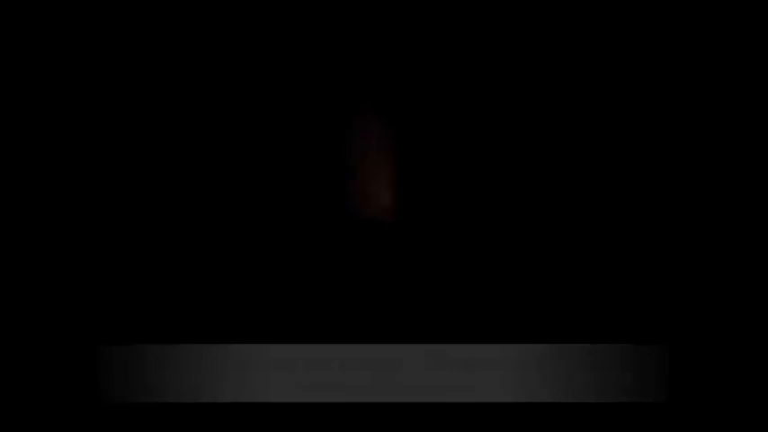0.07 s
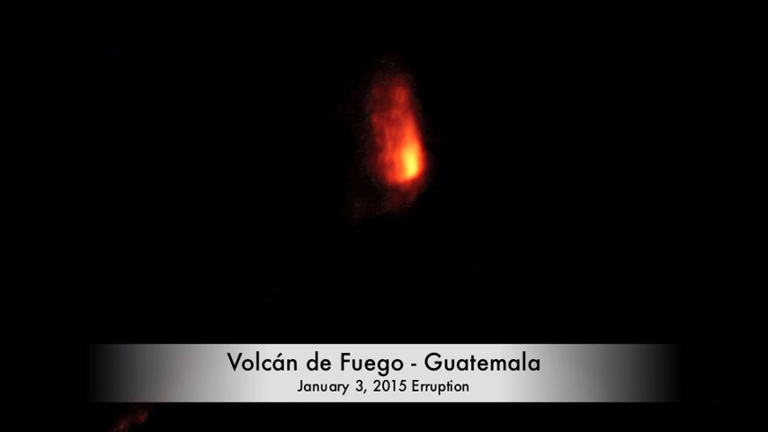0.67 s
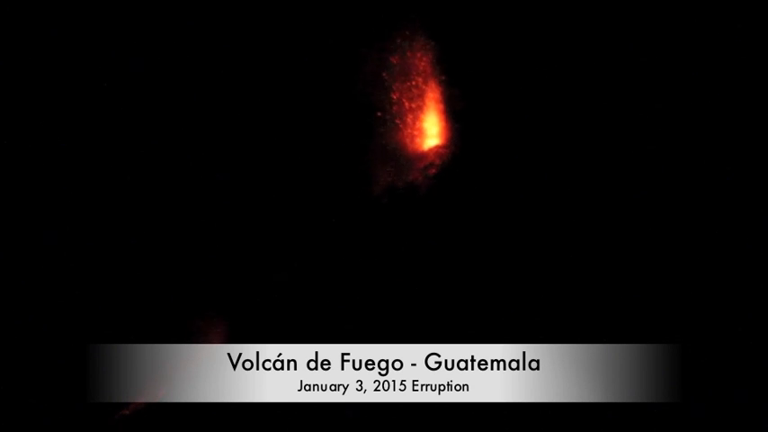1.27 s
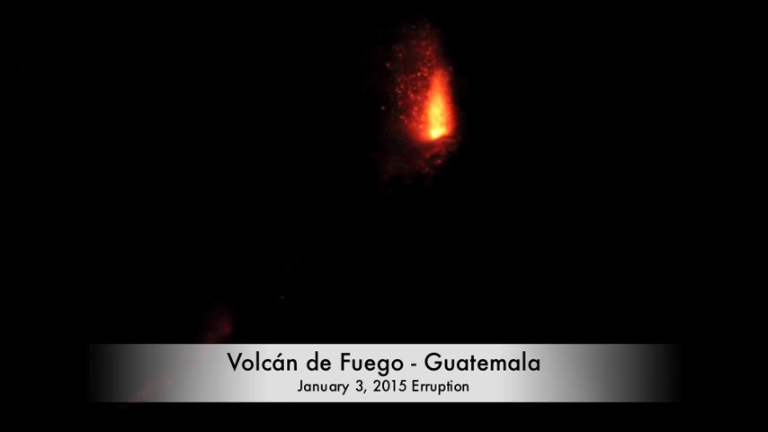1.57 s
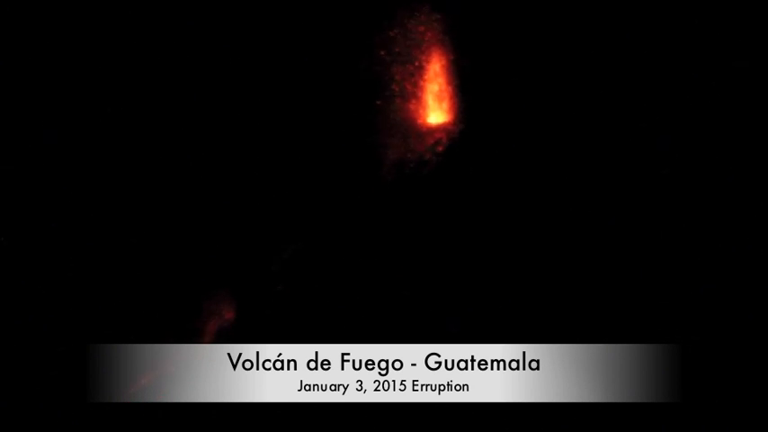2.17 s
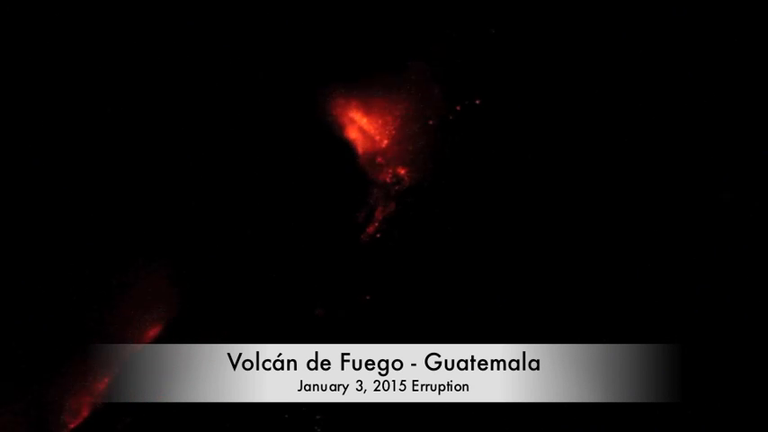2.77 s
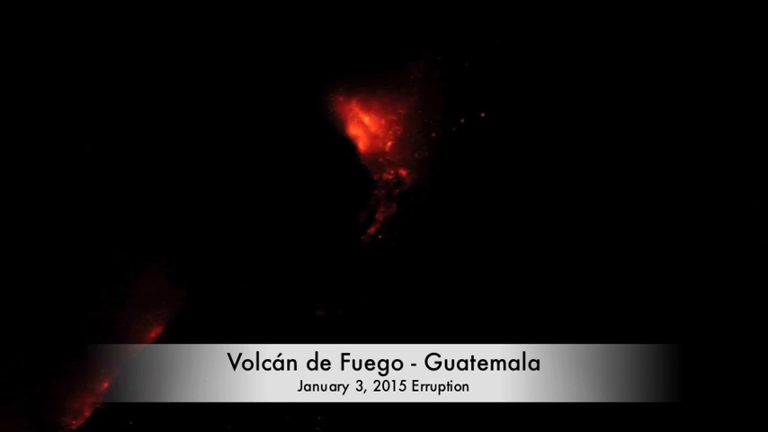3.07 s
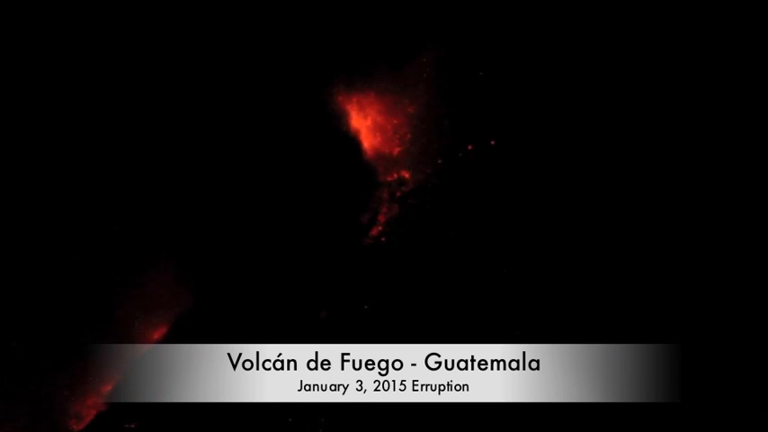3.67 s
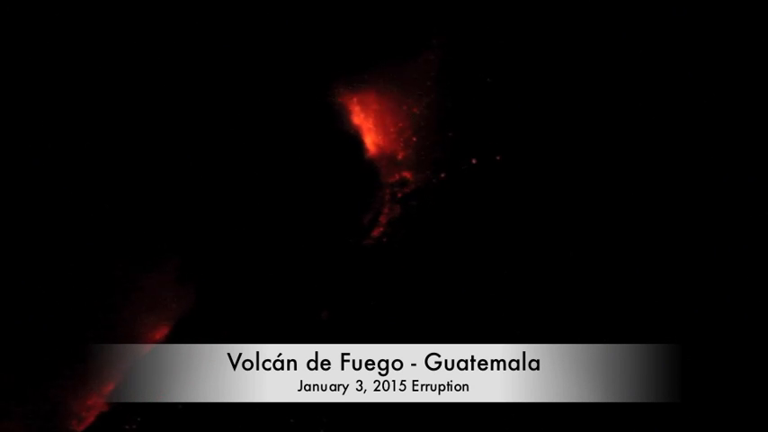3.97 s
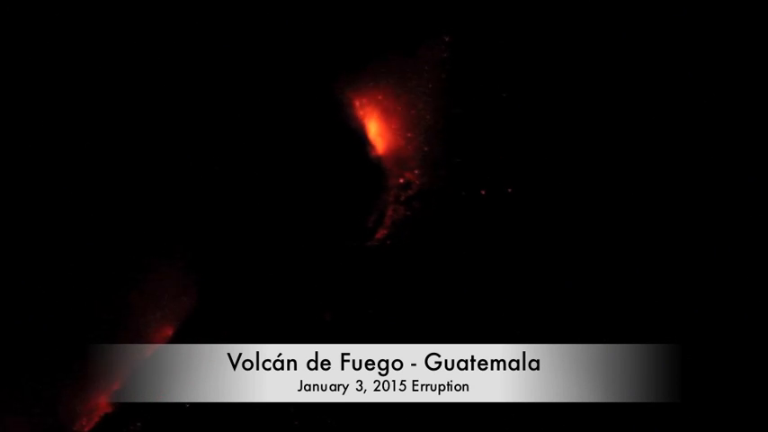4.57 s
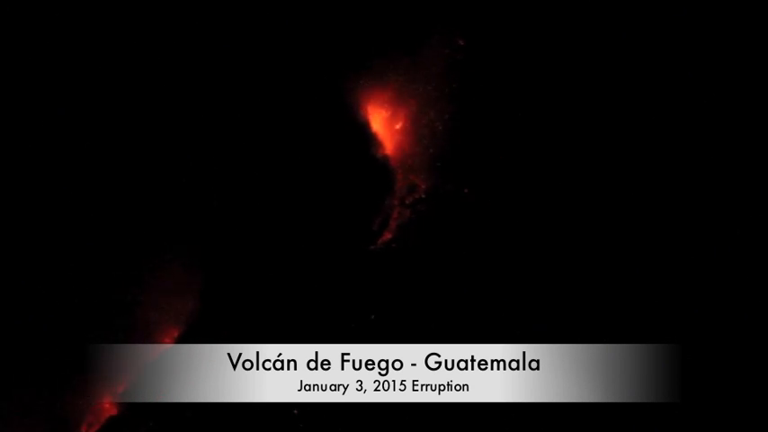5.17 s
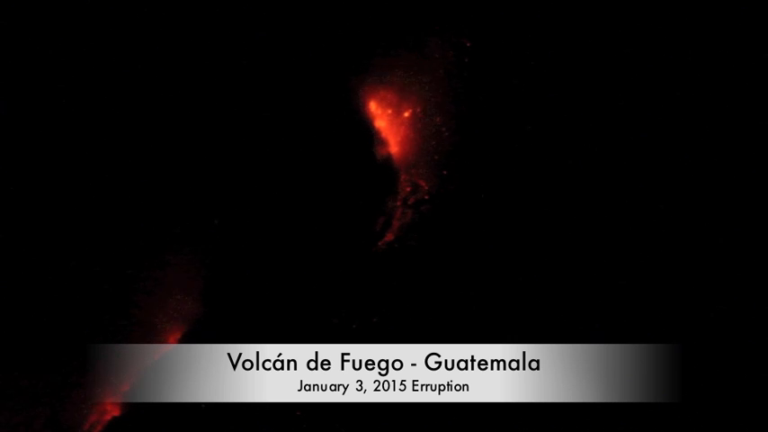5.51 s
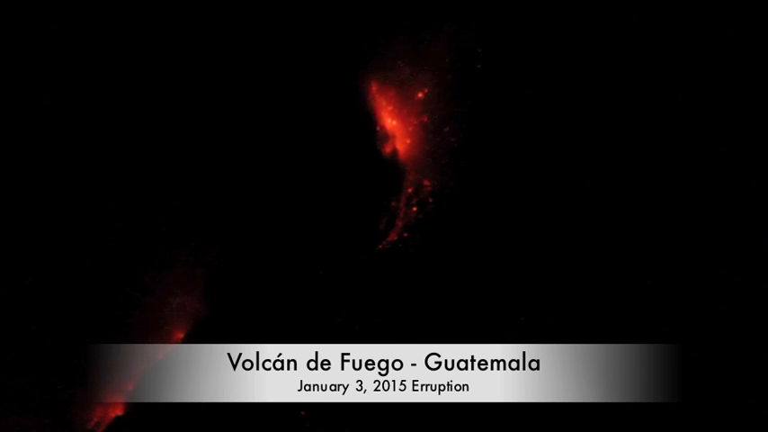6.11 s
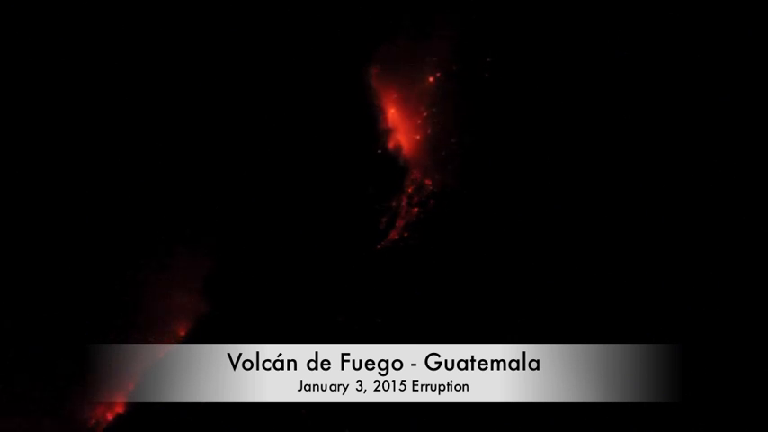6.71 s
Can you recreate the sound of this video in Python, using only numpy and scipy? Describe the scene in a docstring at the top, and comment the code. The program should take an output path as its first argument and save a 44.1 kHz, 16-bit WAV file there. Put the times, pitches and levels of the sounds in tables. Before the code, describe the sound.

A soft, far volcanic rumble fades in with small ticks from the camera and faint night crickets, then fades away. Suddenly the eruption is loud: a steady rush of gas above a low rumble, with a cluster of dull thumps early on and two more later. Crickets keep chirping, a katydid rasps twice very high, and a distant engine hum and a thin electronic whine sit faintly in the background.

```python
"""A volcano at night, in two scenes. The quiet one fades in and out: a far rumble, crickets stroking
their wings, a faintly singing camera body and its ticking lens. The loud one opens on the roar of
turbulent gas leaving the vent, over a surging rumble, dull thumps, a distant engine and more crickets.
A katydid rasps twice, very high, and the camera adds a thin whine to both scenes."""
import sys
import numpy as np
from scipy import signal
from scipy.fft import rfft, irfft, next_fast_len
from scipy.io import wavfile
from scipy.ndimage import uniform_filter1d

SR = 44100
rng = np.random.default_rng(int(sys.argv[2]) if len(sys.argv) > 2 else 0)


def file_out(sig):
    """Save sig as 16-bit WAV at sys.argv[1]."""
    # one column per channel
    cols = np.atleast_2d(sig).T
    # limit, then scale
    lim = np.clip(cols, -1, 1)
    pcm = np.round(lim * 32767).astype(np.int16)
    wavfile.write(sys.argv[1], SR, pcm)


N = 302085
TIME = np.arange(N) / SR
LOUD_START_S = 2.762


def from_db(db):
    """Decibels to gain."""
    return 10 ** (np.asarray(db) / 20)


def rms_one(x):
    """Normalise to rms 1."""
    return x / np.sqrt(np.mean(x ** 2) + 1e-20)


def ramp(age_s, rise_s):
    """A linear fade from 0 to 1, starting at age 0."""
    return np.clip(age_s / rise_s, 0, 1)


def sag(db_per_s):
    """A steady fall in dB, passing 0 as the loud scene opens."""
    return -db_per_s * (TIME - LOUD_START_S)


def automation(points):
    """A line through (time, value) breakpoints, at every sample."""
    return np.interp(TIME, *np.transpose(points))


def drift(rate):
    """Smooth random modulation of rms 1, moving about rate times a second."""
    step, run_in = 40, 2000
    pole = np.exp(-2 * np.pi * rate * step / SR)
    white = rng.standard_normal(N // step + run_in + 2)
    slow = signal.lfilter([1], [1, -2 * pole, pole * pole], white)[run_in:]
    return np.interp(np.arange(N) / step, np.arange(len(slow)), rms_one(slow))


def noise(gain_at):
    """Noise of rms 1, shaped by a function of frequency."""
    size = next_fast_len(N)
    hz = np.maximum(np.fft.rfftfreq(size, 1 / SR), 1)
    return rms_one(irfft(rfft(rng.standard_normal(size)) * gain_at(hz), size)[:N])


def coloured(spectrum):
    """Noise of rms 1 through an EQ curve: f/Hz, level/dB."""
    points_hz, points_db = np.transpose(spectrum)
    return noise(lambda hz: from_db(np.interp(np.log(hz), np.log(points_hz), points_db)))


def resonant(modes):
    """Resonant bands of noise: f/Hz, width/Hz, rms level/dB."""
    return sum(from_db(db) * noise(lambda hz: 1 / (1 + 2 * ((hz - centre) / width) ** 2))
               for centre, width, db in modes)


def split(x, hz):
    """A crossover whose low and high bands sum to the input."""
    low = signal.sosfiltfilt(signal.butter(2, hz, fs=SR, output="sos"), x)
    return low, x - low


def ring(clicks, hz, t60):
    """Each click excites a decaying sine of its own height."""
    r, w = from_db(-60 / (t60 * SR)), 2 * np.pi * hz / SR
    return signal.lfilter([0, np.sin(w)], [1, -2 * r * np.cos(w), r * r], clicks + 1e-18)


# Far eruption's EQ: f/Hz, relative level/dB
FAR_EQ = [(20, -17), (30, -11), (70, -6), (130, -1), (290, -2.5), (350, -7), (470, -3), (530, -10),
          (620, -7), (900, -12), (1200, -19), (1850, -23.5), (2800, -23), (3250, -31.5), (4200, -34),
          (5500, -36.5), (7400, -40.5), (8200, -41.5), (12000, -48), (15000, -49)]
# Its booming resonances: f/Hz, width/Hz, level/dB
FAR_RESONANCES = [(183.5, 36, -40.5), (288.6, 22, -51.5), (1400, 270, -52.5)]
def far_rumble(level_db=-35, fall_db_per_s=1.07, flutter_db=0.85):
    """Over distance the air leaves mostly the low end of the eruption."""
    gain = from_db(level_db - fall_db_per_s * TIME + flutter_db * drift(32))
    return gain * coloured(FAR_EQ) + resonant(FAR_RESONANCES)


# Camera body resonances: f/Hz, width/Hz, level/dB
BODY_MODES = [(2050, 75, -56), (2585, 140, -57.5), (3600, 220, -57.5), (6500, 200, -73), (7300, 300, -74)]
def camera_body():
    """The camera body sings faintly at its resonances."""
    return resonant(BODY_MODES)


# Whine's fader: t/s, level offset/dB
WHINE_FADER = [(.5, -9), (1.1, -3), (2.7, -1), (2.8, 1)]
def camera_whine(hz=15654, level_db=-55.5):
    """A thin electronic tone comes up, then holds through the loud scene."""
    return from_db(level_db + automation(WHINE_FADER)) * np.sqrt(2) * np.sin(2 * np.pi * hz * TIME)


# Cricket beds of the quiet and the loud scene: f/Hz, width/Hz, level/dB
QUIET_TRILLS = [(4660, 140, -67)]
LOUD_TRILLS = [(2675, 4.4, -46), (2804, 28, -41.5), (4660, 270, -66)]
def far_crickets(trills):
    """Far crickets trill without pause, blending into narrow bands."""
    return resonant(trills)


# Chirp cues: t/s, length/s, f/Hz, level/dB
CHIRP_CUES = [(0.125, 0.29, 4650, -64), (.74, 0.27, 4750, -62), (.98, .22, 4600, -63),
              (1.102, 0.3, 4665, -57), (1.378, .22, 4480, -64), (1.92, 0.29, 4800, -60.5),
              (2.36, 0.39, 4600, -63), (4.016, 0.31, 4360, -44), (5.159, .22, 4800, -46),
              (5.9, 0.29, 4570, -42.5), (6.123, .2, 4380, -48)]
def crickets(stroke_hz=55, stroke_depth=0.35, waver_hz=26, edge_s=0.049, flutter_db=3.0):
    """Each chirp is a run of wing strokes; hillside echoes blur its pitch and level."""
    waver, unevenness = waver_hz * drift(96), drift(15)
    flutter = rms_one(from_db(flutter_db * drift(40)))
    out = np.zeros(N)
    for start, length, hz, db in CHIRP_CUES:
        span = (TIME > start) & (TIME < start + length)
        age = TIME[span] - start
        gate = ramp(np.minimum(age, length - age), edge_s)
        strokes = 1 + stroke_depth * np.sin(2 * np.pi * stroke_hz * age + unevenness[span])
        tone = np.sqrt(2) * np.sin(2 * np.pi * np.cumsum(hz + waver[span]) / SR)
        out[span] += from_db(db) * gate * strokes * tone
    return out * flutter


# Tick cues: t/s, level/dB
TICK_CUES = [(0.339, -47), (0.4193, -47.5), (0.4667, -47), (0.5041, -45.5), (0.5909, -46), (0.631, -44),
             (0.6613, -44), (0.6922, -44), (0.719, -46), (0.745, -44.5), (0.8429, -45), (0.8758, -42),
             (0.928, -45), (1.014, -42.5), (1.0998, -43), (1.144, -41), (1.1827, -42), (1.226, -40.5),
             (1.2685, -40.5), (1.306, -41.5), (1.392, -40), (1.697, -43), (1.993, -43), (2.0403, -43),
             (2.126, -42.5), (2.1678, -41), (2.2486, -40), (2.287, -42.5), (2.341, -43), (2.3886, -45),
             (2.63, -53), (2.6792, -57)]
# Lens resonances: f/Hz, level offset/dB, t60/s
LENS_MODES = [(2550, 7, 0.0054), (3000, 1, 0.0057), (2900, 2.5, 0.013), (3550, 1.5, 0.017),
              (3650, -1, 0.014), (3985, -3, 0.037), (6060, -11, 0.0073), (6500, -2.5, .008),
              (7070, -6.5, 0.011), (7380, -8, .007), (8850, -16, 0.0063), (9200, -11, 0.0091),
              (13400, -16, .004)]
def lens_ticks(spread_s=.002, uneven_db=1.9, rebound_s=0.0041, rebound_db=-3.0, rebound_share=.3):
    """Brief scuffs inside the lens reach its modes one after another; some rebound a moment later."""
    starts, db = np.transpose(TICK_CUES)
    count = len(starts)
    rebounds = rng.random(count) < rebound_share
    out = np.zeros(N)
    for hz, mode_db, t60 in LENS_MODES:
        touch_s = starts + .001 + spread_s * rng.random(count)
        strength = from_db(db + mode_db + uneven_db * rng.standard_normal(count))
        force = np.zeros(N)
        force[(touch_s * SR).astype(int)] = strength
        again_s = touch_s + rebound_s + 0.0012 * rng.random(count)
        force[(again_s * SR).astype(int)] += strength * rebounds * from_db(rebound_db)
        out += ring(force, hz, t60)
    return out


def puffs(per_s, decay_s):
    """Random pressure bursts with a fast, rounded attack; mean 0, rms 1."""
    bursts = (rng.random(N) < per_s / SR) * rng.uniform(0.26, 1, N)
    pressure = signal.lfilter([1], [1, -np.exp(-1 / (decay_s * SR))], bursts)
    pressure = uniform_filter1d(uniform_filter1d(pressure, size=40), size=40)
    return rms_one(pressure - pressure.mean())


# Gas jet's EQ: f/Hz, relative level/dB
JET_EQ = [(200, -8), (350, -5), (550, -1), (780, -1.5), (900, 0), (1200, -2.5), (1600, -4), (1950, -8),
          (2350, -6), (2800, -11.5), (3600, -17), (4700, -18.5), (5500, -23.5), (7100, -24), (9000, -31.5),
          (11000, -41), (15500, -50)]
# Its flow, surging once and easing: t/s, level/dB
JET_FADER = [(2.87, -22.5), (3.2, -23.5), (3.88, -22), (4.06, -20), (4.9, -21.5), (6.0, -22.5),
             (6.85, -24.5)]
# Its resonances: f/Hz, width/Hz, relative opening level/dB, fall/(dB/s)
JET_MODES = [(658, 33, -16, -1), (833, 70, -19.5, -2.2), (1045, 61, -6.5, 1.5), (1380, 160, -27, -5),
             (2250, 150, -15, 1)]
# Whistly bands that come and go in the hiss: f/Hz, width/Hz
SWISH_BANDS = [(6300, 220), (6750, 180), (7150, 220), (7800, 530)]
def gas_jet(low_db=3.5, body_db=1.5, treble_db=0.03, sizzle_db=1.17,
            swish_db=-30.5, swish_swing_db=5, puff_db=0.54):
    """Turbulent gas leaves the vent in puffs that shake the whole roar; lows thin out, highs sizzle."""
    low, rest = split(coloured(JET_EQ), hz=630)
    body, treble = split(rest, hz=2700)
    roar = from_db(low_db + sag(db_per_s=1.84)) * low + from_db(body_db) * body
    roar += from_db(treble_db + sizzle_db * drift(20)) * treble
    for hz, width, db, fall_db_per_s in JET_MODES:
        roar += from_db(sag(fall_db_per_s)) * resonant([(hz, width, db)])
    for hz, width in SWISH_BANDS:
        swing = rms_one(from_db(swish_swing_db * drift(12)))
        roar += swing * resonant([(hz, width, swish_db)])
    return roar * from_db(automation(JET_FADER) + puff_db * puffs(per_s=120, decay_s=0.0053))


# EQ of the rumble under the jet: f/Hz, relative level/dB
RUMBLE_EQ = [(20, -20), (40, -11), (70, -5.5), (115, 2.5), (160, 0.5), (220, -1.5), (295, -2), (345, -18),
             (600, -41), (4000, -80)]
# Gas surges: centre t/s, length/s, deep band boost/dB, upper band boost/dB
SURGE_CUES = [(2.932, 0.13, -1, 2.5), (3.194, 0.15, 5.5, 6.5), (3.387, 0.11, 4, 11.5),
              (3.547, 0.17, -6, 10), (3.747, 0.077, -5, 5.5), (5.16, .1, 5, 2), (5.433, 0.15, 3.5, -1),
              (6.18, 0.17, 10, 0.5), (6.742, 0.045, 10, 0)]
def vent_rumble(lump_db=0.74):
    """Lumpy low turbulence slowly eases; each surge of gas swells or ducks its two bands."""
    deep_db = -18 + sag(db_per_s=1.45)
    upper_db = -24 + sag(db_per_s=2.0)
    for centre, length, deep_boost_db, upper_boost_db in SURGE_CUES:
        swell = np.maximum(1 - (2 * (TIME - centre) / length) ** 2, 0)
        deep_db += deep_boost_db * swell
        upper_db += upper_boost_db * swell
    deep, upper = split(coloured(RUMBLE_EQ), hz=114)
    return (from_db(deep_db) * deep + from_db(upper_db) * upper) * from_db(lump_db * drift(22))


# Engine's firing rate: t/s, f/Hz
FIRING_RATE = [(2.8, 59.9), (3.3, 58.2), (4.2, 58.42), (5.3, 62.54), (6.1, 63.86), (6.85, 67.3)]
# Its harmonics: multiple, opening level/dB, fall/(dB/s)
ENGINE_HARMONICS = [(1, -34, 0), (2, -29.5, 1.1), (3, -26.5, 2.3), (4, -41.5, -0.56)]
def engine(jitter=0.0066, flutter_db=2.0):
    """A far engine dips, then slowly gains speed; each harmonic flutters on its own in the night air."""
    firing_hz = automation(FIRING_RATE) * (1 + jitter * drift(7.4))
    phase = 2 * np.pi * np.cumsum(firing_hz) / SR
    out = np.zeros(N)
    for multiple, db, fall_db_per_s in ENGINE_HARMONICS:
        gain = from_db(db + sag(fall_db_per_s) + flutter_db * drift(5))
        out += gain * np.sqrt(2) * np.sin(multiple * phase + rng.uniform(0, 2 * np.pi))
    return out


# Rasp cues: t/s, length/s, level/dB
RASP_CUES = [(2.765, 0.85, -46), (5.42, 0.85, -46)]
# Wing resonances: f/Hz, width/Hz, level offset/dB
WING_MODES = [(13790, 200, -9.5), (14400, 1000, -9), (15000, 160, -13), (15700, 200, -7)]
def katydid(stroke_hz=55.3, width_cycles=.13, scrape_db=-11, edge_s=.035, uneven_db=1.0):
    """A rasp near the top of hearing: a sharp, uneven pulse per wing stroke, a softer scrape between."""
    cycle = (TIME * stroke_hz) % 1 - .5
    pulses = np.exp(-.5 * (cycle / width_cycles) ** 2)
    strokes = rms_one((from_db(scrape_db) + pulses) * from_db(uneven_db * drift(30.2)))
    calls = sum(from_db(db) * ramp(np.minimum(TIME - start, start + length - TIME), edge_s)
                for start, length, db in RASP_CUES)
    return calls * strokes * resonant(WING_MODES)


# Thump cues: t/s, level before trim/dB, f/Hz
THUMP_CUES = [(2.97, -7, 130), (3.186, -11, 97), (3.215, -4.5, 269), (3.224, -6, 280), (3.246, -2, 129),
              (3.343, -11, 125), (3.373, -5, 170), (3.393, -6, 149), (3.501, -1, 120), (3.589, -8, 232),
              (5.159, -6.5, 85), (6.2, -7, 74)]
def thumps(trim_db=-2.5, width_cycles=0.52):
    """Each dull thump is one rounded pressure peak with a dip on either side."""
    out = np.zeros(N)
    for centre, db, hz in THUMP_CUES:
        cycles = (TIME - centre) * hz
        near = np.abs(cycles) < 2
        envelope = np.exp(-(cycles[near] / width_cycles) ** 2)
        out[near] += from_db(db + trim_db) * envelope * np.cos(2 * np.pi * cycles[near])
    return out


def scene():
    """The quiet scene fades in and out, then the loud one comes in fast; mono."""
    quiet_fade = ramp(TIME - .085, rise_s=.5) * ramp(2.758 - TIME, 0.49)
    loud_fade = ramp(TIME - LOUD_START_S, rise_s=0.09)
    both = crickets() + camera_whine()
    quiet = far_rumble() + camera_body() + far_crickets(QUIET_TRILLS) + both
    loud = gas_jet() + vent_rumble() + thumps() + engine() + far_crickets(LOUD_TRILLS) + both
    return (quiet_fade * quiet + loud_fade * loud + lens_ticks() + katydid())[None]


def record(dry):
    """A steep low-pass on the mix, just above the whine."""
    cutoff_hz = 15900
    return signal.sosfilt(signal.ellip(12, .1, 90, cutoff_hz, fs=SR, output="sos"), dry)


dry = scene()
out = record(dry)
file_out(out)
```